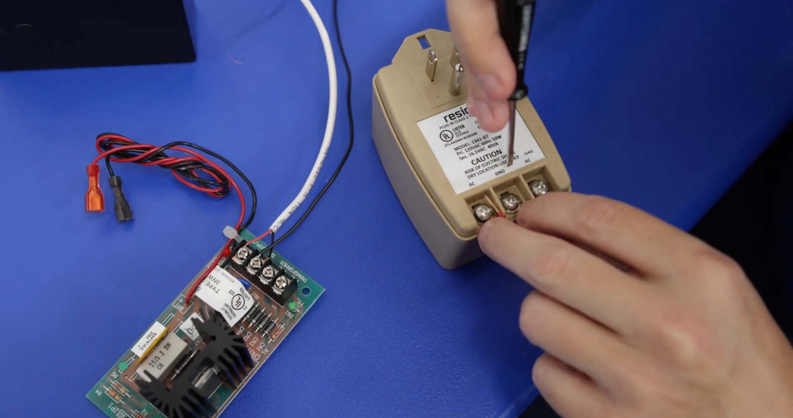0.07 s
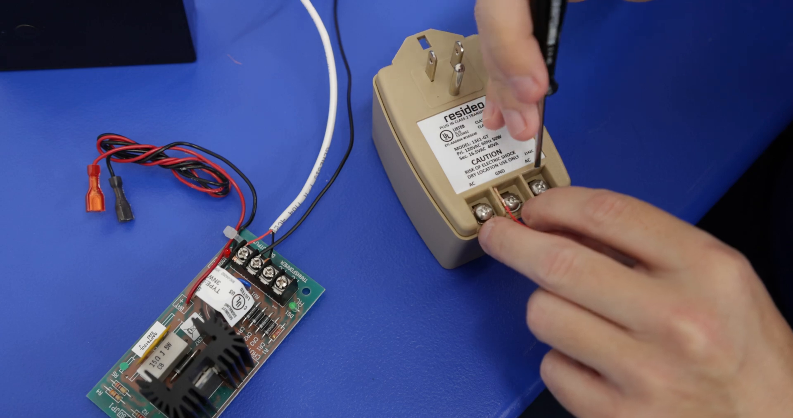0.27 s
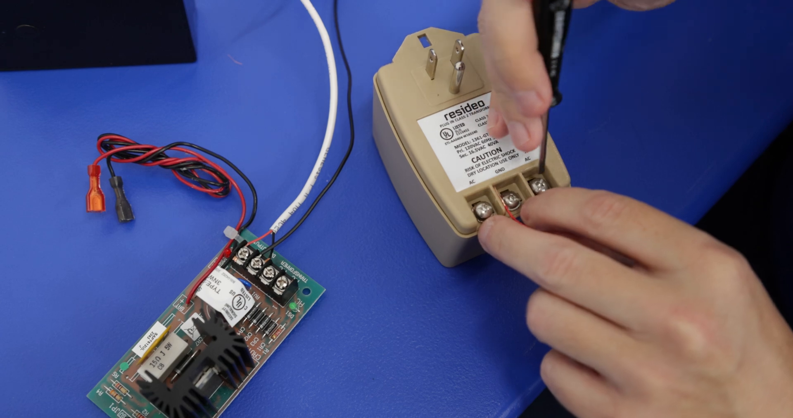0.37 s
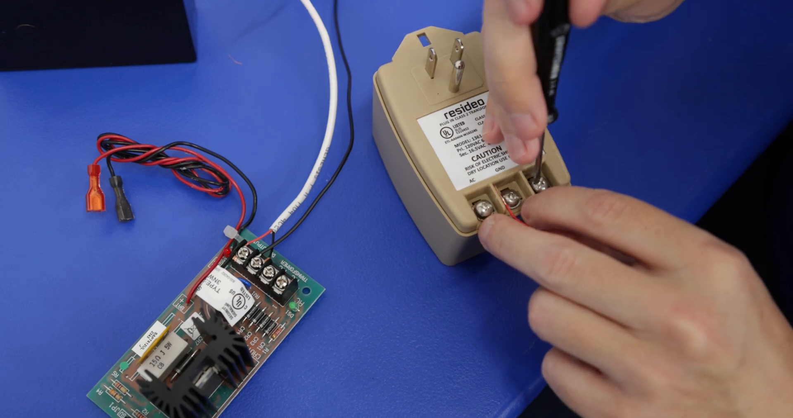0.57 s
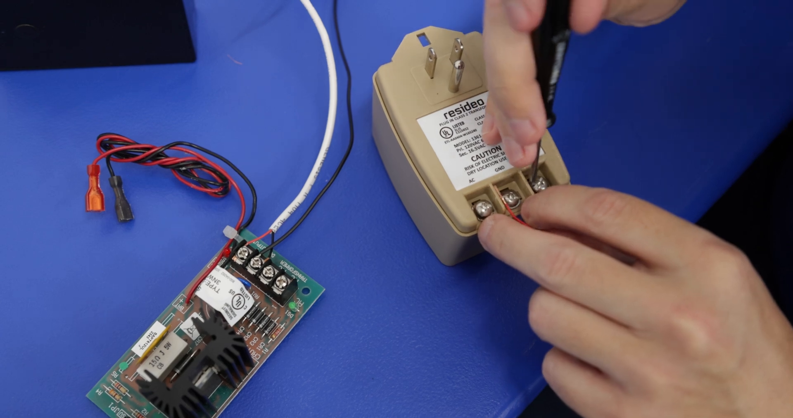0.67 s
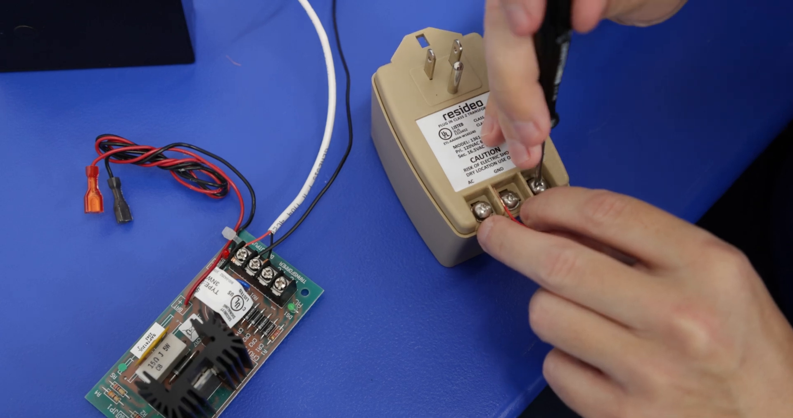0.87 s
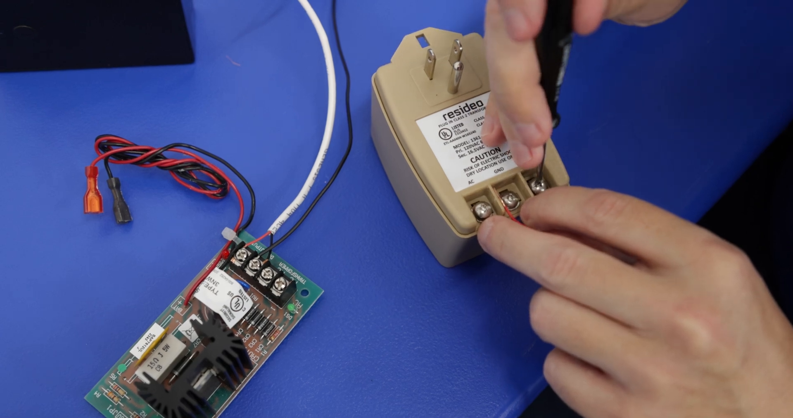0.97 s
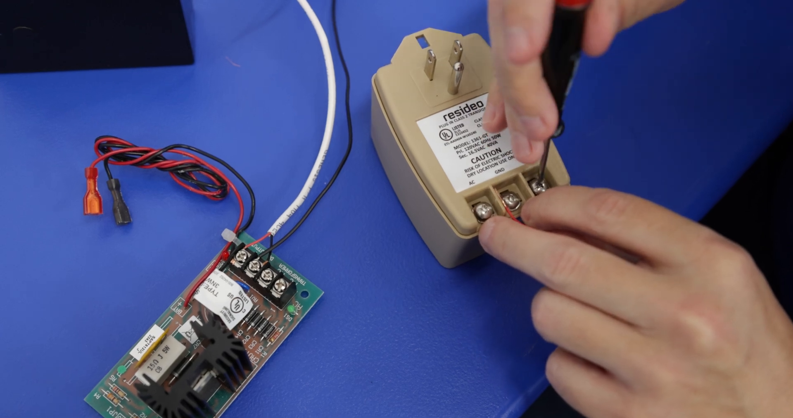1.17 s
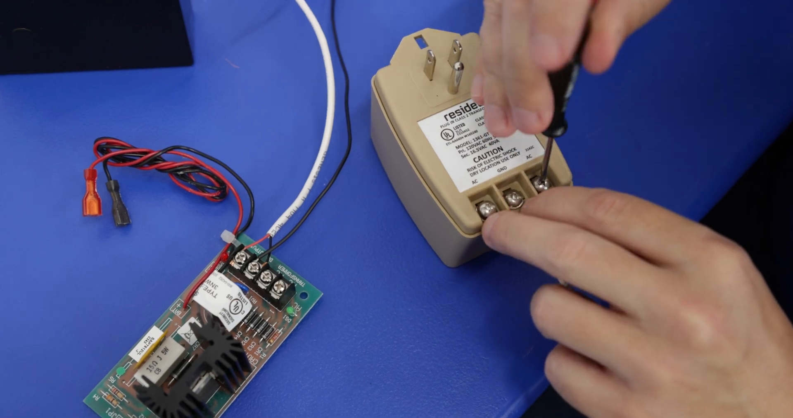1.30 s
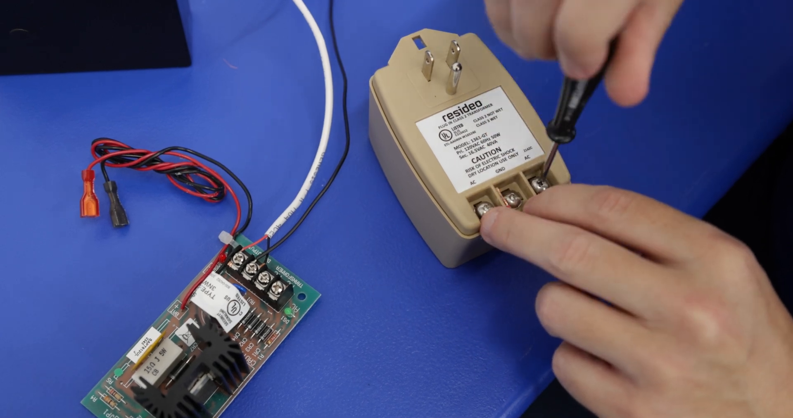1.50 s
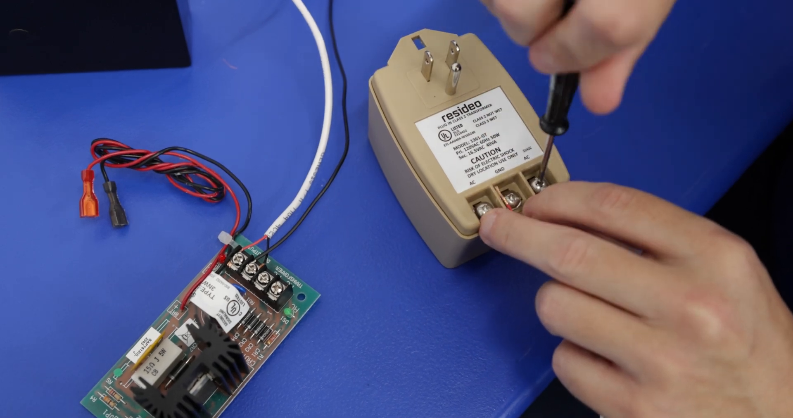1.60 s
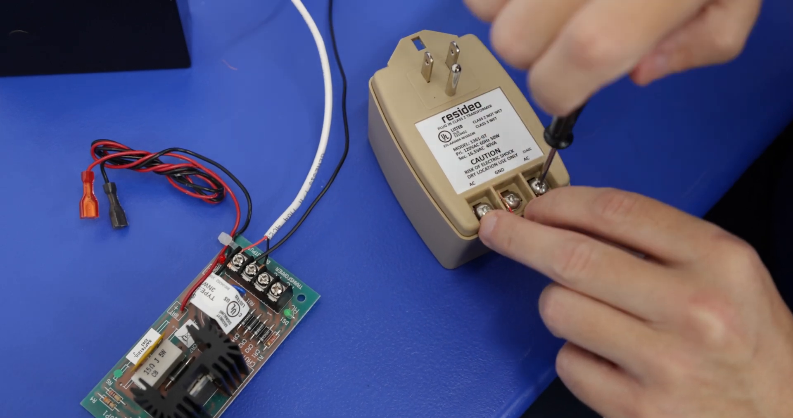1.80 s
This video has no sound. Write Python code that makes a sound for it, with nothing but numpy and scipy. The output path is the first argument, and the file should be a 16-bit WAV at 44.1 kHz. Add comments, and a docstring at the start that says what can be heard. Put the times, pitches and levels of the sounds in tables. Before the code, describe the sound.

A small screwdriver lands on a power adapter's screw with one sharp knock, ringing the hollow plastic case and softly thudding the table. Quieter scrapes and dry ticks follow as it seeks the slot, close by in a quiet room.

```python
"""A small screwdriver works on the screw terminals of a plastic power adapter lying on a table.
In a small, quiet room, a faint tap comes first. Then the blade lands with one sharp knock,
and the tabletop answers with a soft thud. After that the blade skids, catches and ticks on the
screw head while it finds the slot. Every contact rings the hollow case, makes a dry tick
and sets the steel ringing briefly."""
import sys
import numpy as np
from scipy import signal
from scipy.fft import rfft, irfft
from scipy.io import wavfile
from scipy.ndimage import uniform_filter1d

SR = 44100
rng = np.random.default_rng(int(sys.argv[2]) if len(sys.argv) > 2 else 0)


def inscribe(sig):
    """Save sig as 16-bit PCM at rate SR to the path in sys.argv[1].

    A 1-D sig is mono; a 2-D sig holds one channel per row.
    Samples are clipped to [-1, 1] before scaling.
    """
    pcm = np.round(np.clip(np.atleast_2d(sig).T, -1, 1) * 32767)
    wavfile.write(sys.argv[1], SR, pcm.astype(np.int16))


N = 81585


def amp(db):
    """Turns decibels into a number to multiply a sound by."""
    return 10 ** (np.asarray(db) / 20)


def unit(x):
    """Scales a sound to an energy of one."""
    return x / np.sqrt(np.sum(x ** 2) + 1e-20)


def read(points, hz):
    """Reads between the rows of a table, with frequency spaced as on a keyboard."""
    row_hz, value = np.transpose(points)
    return np.interp(np.log(hz + 1), np.log(row_hz + 1), value)


def add(mix, start_s, sound):
    """Mixes a sound in at the given time."""
    part = mix[max(round(start_s * SR), 0):][:len(sound)]
    part += sound[:len(part)]


def seconds(size):
    """The time of each sample."""
    return np.arange(size) / SR


def fade(t, fade_s):
    """Dies away by 60 dB in fade_s seconds, the fade time."""
    return np.exp(-np.log(1000) * t / fade_s)


def shortest_click(gain_db):
    """The shortest click that has these levels from low to high frequency."""
    log_gain = np.log(amp(np.r_[gain_db, gain_db[-2:0:-1]]))
    spectrum = np.exp(np.conj(signal.hilbert(log_gain)))
    return irfft(spectrum[:len(gain_db)])


def scatter(fade_s, size):
    """A dying burst of dense echoes, about equally strong at all frequencies."""
    shape = fade(seconds(size), fade_s)
    burst = rng.standard_normal(size) * shape
    for _ in range(3):  # even out the frequencies, then restore the fade
        spectrum = rfft(burst)
        burst = irfft(spectrum / (abs(spectrum) + 1e-12), size)
        power = abs(uniform_filter1d(burst ** 2, size=128))
        burst = burst * shape / np.sqrt(power + 1e-14)
    return unit(burst)


def background():
    """The room rumbles low and hisses faintly throughout."""
    # Each row: frequency in Hz, relative noise level in dB.
    noise_levels = [(12, -10.5), (25, 2.5), (58, 4), (90, -9.5), (120, -8.5), (220, -16.5), (500, -24),
                    (1000, -29), (2000, -34), (4000, -42.5), (8000, -43.5), (12300, -47), (13500, -57),
                    (16000, -57.5)]
    gain = amp(read(noise_levels, np.fft.rfftfreq(N, 1 / SR)))
    noise = irfft(rfft(rng.standard_normal(N)) * gain, N)
    return amp(db=-63.5) * noise / noise.std()


def case_ring(tilt_db, hollow_db):
    """The hollow plastic case rings; more tilt brings out its higher tones."""
    # The case's own tones. Each row: pitch in Hz, relative level in dB, fade time in seconds.
    case_tones = [(268.4, -17.5, .12), (473, -10, .045), (529, -11.5, .07), (603.3, 3, 0.053),
                  (729, -10.5, 0.15), (825, -2.5, 0.031), (975.5, 4, 0.044), (1072, 1.5, 0.033),
                  (1262, -10, 0.039), (1490, -15, .04), (1678, -3.5, 0.025), (1790, -14, 0.076),
                  (1950, -15, 0.027), (2744, -5.5, 0.02), (3132, -25.5, 0.022)]
    hollow_hz, hollow_width_hz = 500, 85
    rise_s, push_s, cut_hz = 0.00062, 0.00093, 410
    t = seconds(size=8192)
    hz, db, fade_s = np.transpose(case_tones)[:, :, None]
    db = db + tilt_db * np.log2(hz / 900)  # tilt around 900 Hz
    # Pressing on the case brings out its low tones.
    db = db + hollow_db * np.exp(-((hz - hollow_hz) / hollow_width_hz) ** 2)
    sign = (-1) ** np.arange(len(case_tones))[:, None]
    ring = (sign * amp(db) * fade(t, fade_s) * np.sin(2 * np.pi * hz * t)).sum(0)
    ring *= 1 - np.exp(-t / rise_s)
    ring *= 1 + amp(db=0.5) * np.exp(-t / push_s)  # the case moves furthest just after the blow
    # The small case gives off little sound below cut_hz.
    bass_cut_db = read([(cut_hz * 0.93, -10), (cut_hz, 0)], np.fft.rfftfreq(4096, 1 / SR))
    return signal.fftconvolve(ring, shortest_click(bass_cut_db))


def tick(tilt_db):
    """A dry tick: a sharp edge, then many small vibrations that die quickly."""
    # Each row: frequency in Hz, relative level of the tick in dB.
    tick_levels = [(200, -21.5), (600, -11), (1200, 3.5), (1750, 3), (2300, 0), (2800, -0.5), (3250, -4.5),
                   (3900, 2), (4800, -0.5), (6000, -4.5), (7500, -7), (9600, -14), (11200, -24.5),
                   (13500, -37), (16000, -40)]
    hz = np.fft.rfftfreq(2048, 1 / SR)
    octaves = np.log2(np.clip(hz, 500, 8000) / 4000)  # tilt around 4000 Hz
    edge = shortest_click(read(tick_levels, hz) + tilt_db * octaves)
    burst = amp(db=7.5) * scatter(fade_s=0.031, size=2048)
    burst[0] += 1  # lets the edge itself through
    return signal.fftconvolve(edge, burst)


def steel_ring(pitch_hz):
    """Blade and screw give a short, high zing of close tones, damped by the fingers."""
    # Each row: multiple of the pitch, relative level of the zing in dB.
    steel_levels = [(.3, -40), (.72, -24.5), (.88, -5.5), (1.0, 4), (1.08, -6.5), (1.22, -14.5),
                    (1.4, -30.5), (2.5, -44)]
    hz = np.fft.rfftfreq(2048, 1 / SR)
    zing = shortest_click(read(steel_levels, hz / pitch_hz))
    return signal.fftconvolve(zing, scatter(fade_s=0.022, size=2048))


def contact(force, case_db, case_tilt_db, hollow_db, tick_db, tick_tilt_db, steel_db, steel_hz):
    """A force on the screw head sounds the case, the tick and the steel; more tilt is brighter."""
    out = np.zeros(SR // 2)
    for db, ring in [(case_db, case_ring(case_tilt_db, hollow_db)),
                     (tick_db, tick(tick_tilt_db)),
                     (steel_db, steel_ring(steel_hz))]:
        add(out, 0, amp(db) * unit(signal.fftconvolve(force, ring)))
    return out


def blade_clicks():
    """The blade hits the screw with single jolts; the second is the loud knock."""
    # Each row: start in seconds, case level in dB, case tilt in dB per octave, hollowness in dB,
    # tick level in dB, tick tilt in dB per octave, steel level in dB, steel pitch in Hz.
    clicks = [ (0.1220, -48, 0, 4, -49.5, -10, -66, 7300), (0.2357, 12, 0.5, 4, -1, 0, -16.5, 7137),
              (0.3078, -39, -2.5, 5, -27, -1.5, -28, 8800), (0.3118, -36, -21, 2, -22.5, 8, -13.5, 7640),
              (0.7238, -28, -4, -20, -31, 4.5, -42, 9230), (0.7318, -43, 13, -10, -29, -2, -32, 7100),
              (0.7390, -37, 6, -15, -28.5, -4.5, -30, 3970), (0.9555, -27.5, 1, 0, -25.5, 17, -22, 9350),
              (0.9655, -30, -3, 14, -55, 41, -36, 9600), (0.9718, -25, -5, -9, -29, -6.5, -32, 9400),
              (0.9770, -33, -4, -19, -26.5, 9.5, -34, 9800), (0.9885, -39, 32, -16, -21.5, -5, -27, 9140),
              (0.9922, -19, -2, -44, -26.5, 1, -54, 9600), (1.0370, -26.5, 2, 4, -32.5, 12, -35.5, 8000),
              (1.0393, -21, -1, -23, -27, -6, -32, 4630), (1.0432, -25.5, -0.5, 12, -30.5, -9, -41, 7300),
              (1.1207, -23.5, -1.5, 21.5, -29, 0, -33.5, 7200),
              (1.5060, -44, 13, -4, -33, 5.5, -27.5, 7540), (1.5082, -40, 16, -8, -30.5, 0.5, -30, 7540),
              (1.5585, -66, -5, 0, -52, 9, -47.5, 2793), (1.7540, -50, 41, -9, -48.5, 11, -45, 6800),
              (1.8055, -68, 27, 4, -51, 9, -48, 2820), ]
    out, jolt = np.zeros(N), np.ones(1)
    for start_s, *colour in clicks:
        add(out, start_s, contact(jolt, *colour))
    return out


def room_echo(sound):
    """Sound bounces off the table and the hands, then dies away in the small room."""
    # Each row: frequency in Hz, relative level of the room's echo in dB.
    echo_levels = [(150, -0.5), (400, -1.5), (700, 1), (1500, 0), (3000, 0), (7000, -6), (9500, -10.5),
                   (14000, -1.5)]
    # Each row: frequency in Hz, fade time of the room's echo in seconds.
    fade_times = [(150, 0.42), (600, 0.2523), (1200, 0.37), (3000, 0.39), (7000, 0.25), (14000, .16)]
    hz, t, bands = signal.stft(rng.standard_normal(SR // 2), SR, nperseg=256)
    bands = bands * amp(read(echo_levels, hz)[:, None]) * fade(t, read(fade_times, hz)[:, None])
    tail = unit(signal.istft(bands, SR, nperseg=256)[1])
    close_bounces = scatter(fade_s=0.08, size=8192)
    echo = np.zeros(SR)
    add(echo, start_s=0.002, sound=amp(db=-14) * close_bounces)
    add(echo, start_s=0.0073, sound=amp(db=-18) * tail)
    return signal.fftconvolve(sound, echo)[:N]


def table_thud():
    """The tabletop swells into a soft thud after the knock."""
    # Each row: pitch in Hz, level in dB before the swell shapes it, fade time in seconds.
    table_tones = [(67, -41, .3), (116, -28, .19), (172, -31, .11), (221.7, -32, .14), (266.7, -27, .13)]
    rise_s = 0.028
    t, out = seconds(SR // 2), np.zeros(N)
    thud = sum(amp(db) * fade(t, fade_s) * np.sin(2 * np.pi * hz * t) for hz, db, fade_s in table_tones)
    swell = 1 - np.exp(-(t / rise_s) ** 2)
    add(out, start_s=0.238, sound=thud * swell)
    return out


def slips(length_s, rate_hz, uneven):
    """The blade sticks and slips: a run of tiny jolts that swells and fades."""
    spread_db = 3.5
    gap, strength = rng.standard_normal(size=(2, 400))
    times = np.cumsum(np.exp(uneven * gap - uneven ** 2 / 2)) / rate_hz
    inside = times < length_s
    arch = np.sin(np.pi * times[inside] / length_s) ** 1.13
    force = np.zeros(int(length_s * SR) + 2)
    force[(times[inside] * SR).astype(int)] = amp(spread_db * strength[inside]) * arch
    return force


def blade_skids():
    """The blade scrapes over the screw head while it finds the slot."""
    # Each row: start in seconds, length in seconds, slips per second, unevenness from 0 to 1,
    # case level in dB, case tilt in dB per octave, hollowness in dB, tick level in dB,
    # tick tilt in dB per octave, steel level in dB, steel pitch in Hz.
    skids = [ (0.307, 0.0081, 1950, 0.88, -33, -9.5, -8, -39, -1, -20, 4600),
             (0.718, 0.037, 937, 0.29, -18.5, -3, -3, -22.5, -5, -28, 4060),
             (0.752, 0.045, 1190, 0.75, -27, 6.5, 23.5, -27, -4, -35, 4250),
             (0.818, 0.023, 830, 0.06, -29.5, 4.5, -5, -31.5, -3.5, -43, 4860),
             (0.957, 0.035, 970, 0.17, -10, -4.5, -11, -36, 18, -24, 5200),
             (0.954, 0.032, 250, .7, -52, -3, 0, -48, -1, -33, 13000),
             (1.021, 0.038, 960, .15, -19.5, -2.5, -1, -24.5, -3.5, -43.5, 8500),
             (1.096, 0.069, 980, 0.9, -28.5, 2.5, 22, -29, -9, -49, 6760),
             (1.362, 0.067, 814, .08, -39.5, -10.5, -1, -52, 4, -34, 7600),
             (1.493, 0.04, 1550, 0.74, -37, 13, -6, -36.5, -5, -39, 7440),
             (1.616, 0.095, 1200, 0.82, -26, 3, 19.5, -34, 7.5, -40.5, 6760),
             (1.648, 0.083, 2350, 0.67, -49, -11, -15, -37.5, 16.5, -47, 14000),
             (1.708, 0.16, 940, 0.89, -44.5, -12, 1, -44, 3.5, -43.5, 6820), ]
    out = np.zeros(N)
    for start_s, length_s, rate_hz, uneven, *colour in skids:
        add(out, start_s, contact(slips(length_s, rate_hz, uneven), *colour))
    return out


def scene():
    """The screwdriver and its echo, with the table's thud and the room's background noise."""
    screwdriver = blade_clicks() + blade_skids()
    return (screwdriver + room_echo(screwdriver) + table_thud() + background())[None]


def record(dry):
    """Takes away the very highest treble."""
    top_hz = 16400
    treble_cut = signal.firwin(511, top_hz, window=("kaiser", 9), fs=SR)
    return signal.oaconvolve(dry, treble_cut[None], "same")


dry = scene()
out = record(dry)
inscribe(out)
```